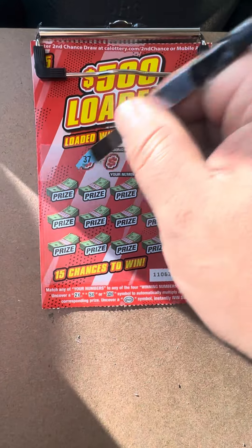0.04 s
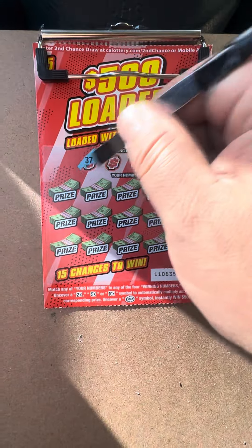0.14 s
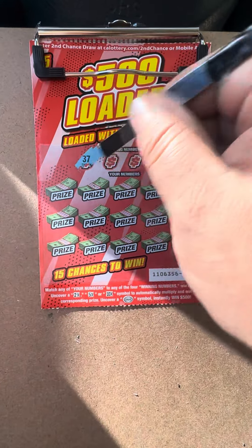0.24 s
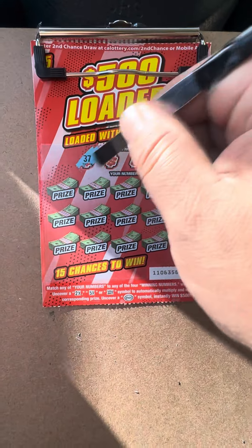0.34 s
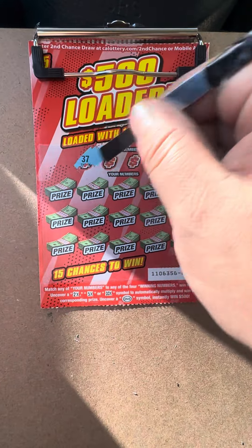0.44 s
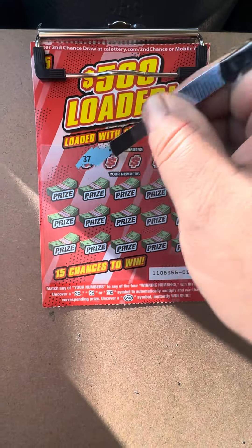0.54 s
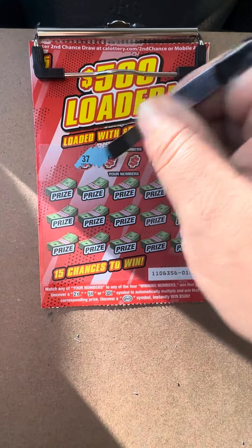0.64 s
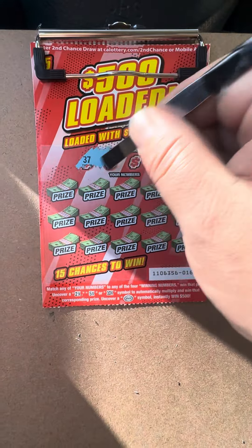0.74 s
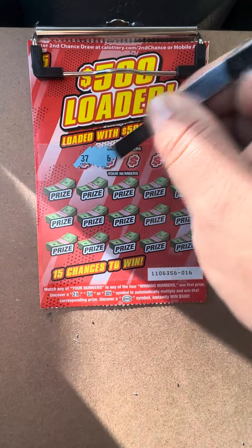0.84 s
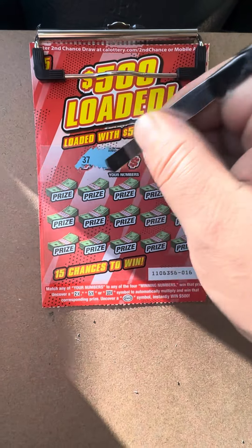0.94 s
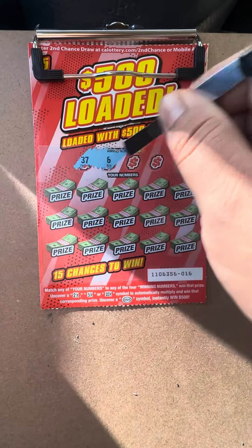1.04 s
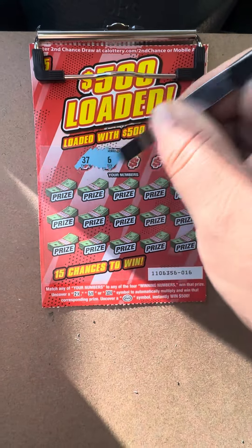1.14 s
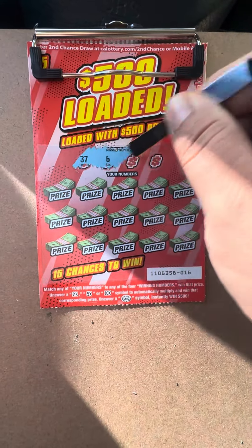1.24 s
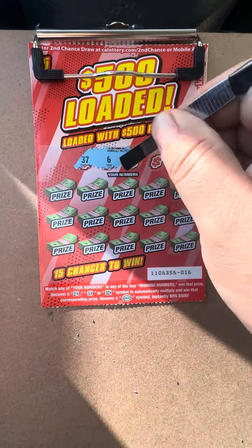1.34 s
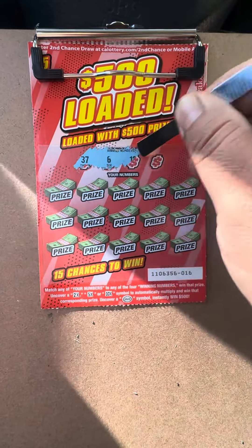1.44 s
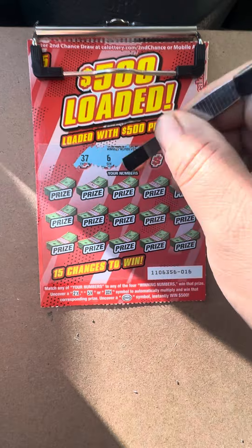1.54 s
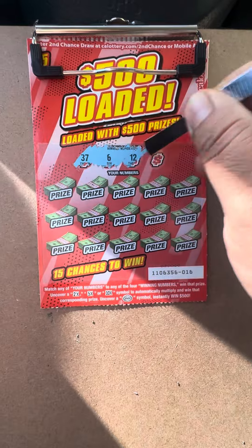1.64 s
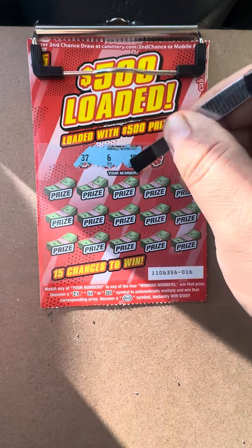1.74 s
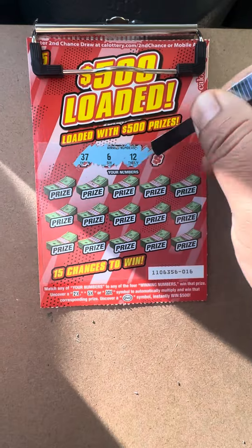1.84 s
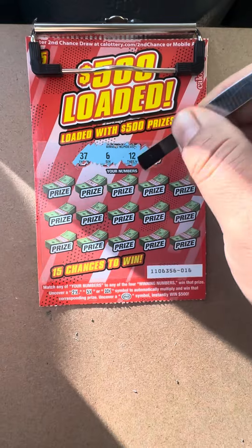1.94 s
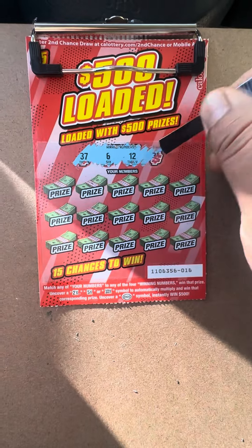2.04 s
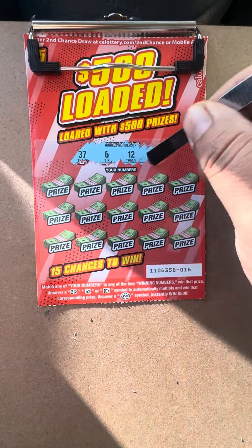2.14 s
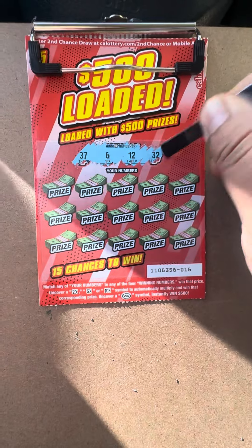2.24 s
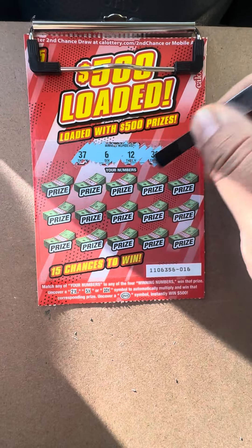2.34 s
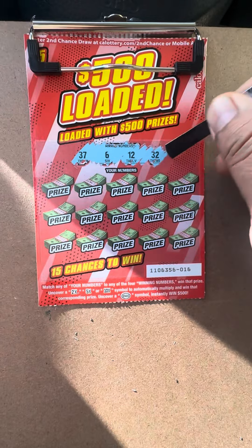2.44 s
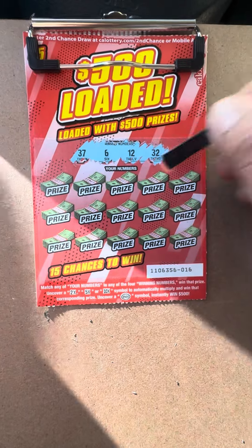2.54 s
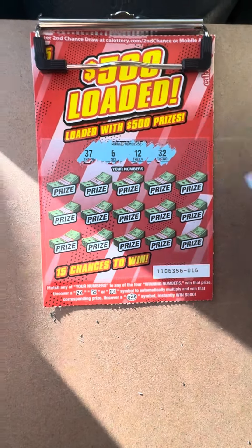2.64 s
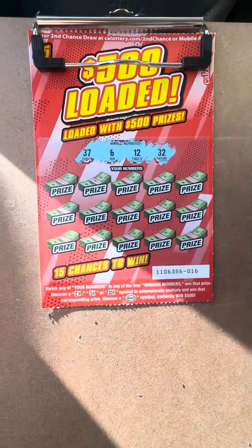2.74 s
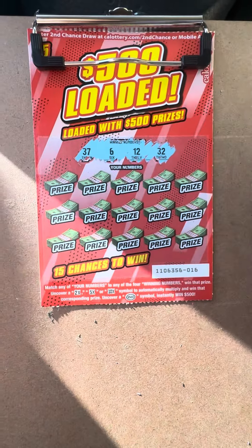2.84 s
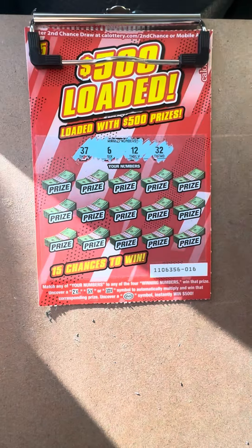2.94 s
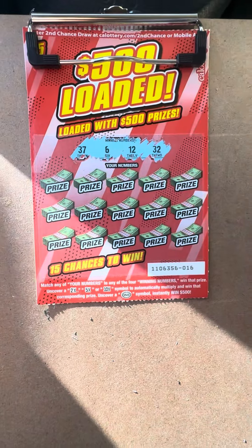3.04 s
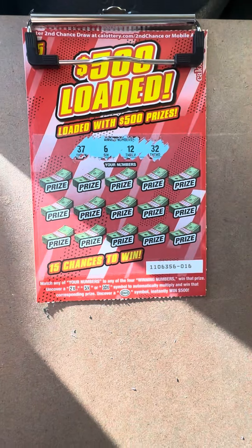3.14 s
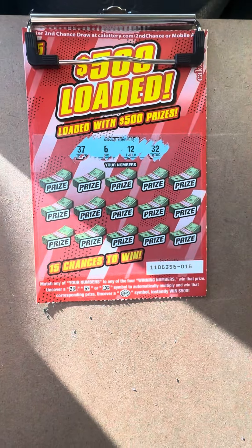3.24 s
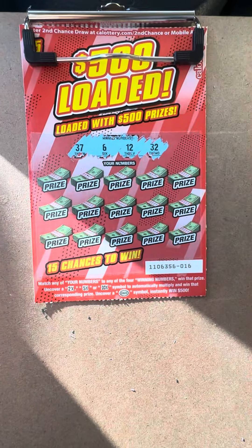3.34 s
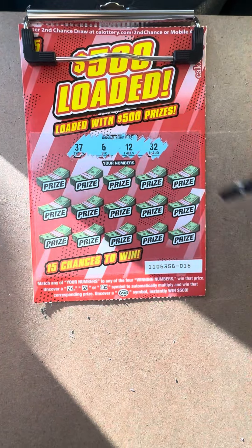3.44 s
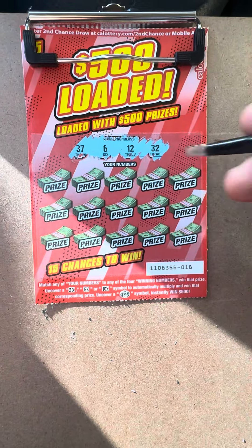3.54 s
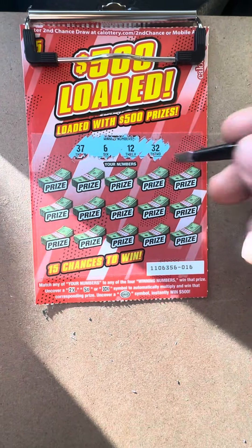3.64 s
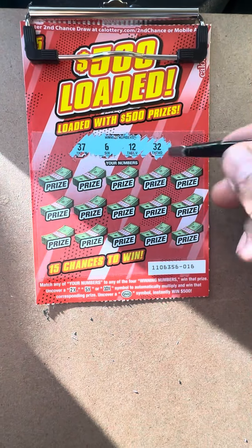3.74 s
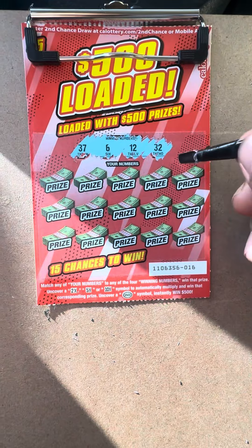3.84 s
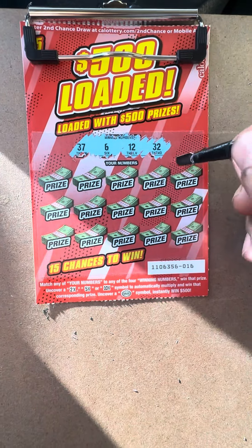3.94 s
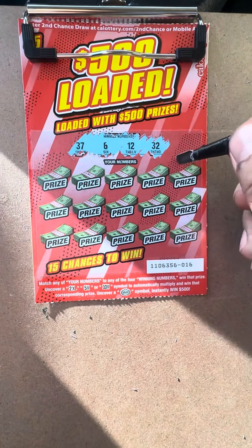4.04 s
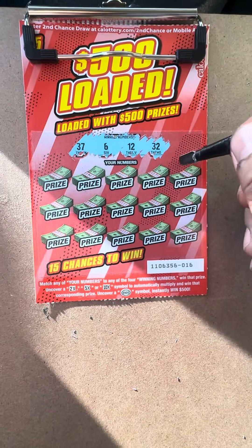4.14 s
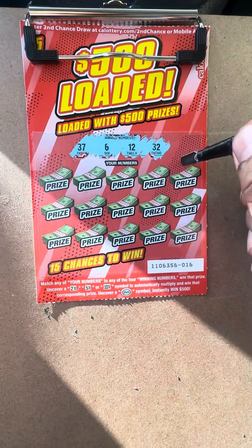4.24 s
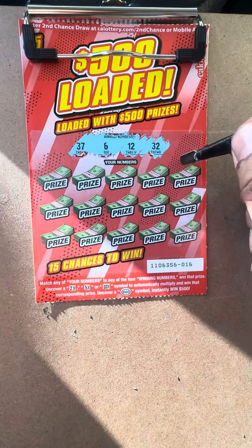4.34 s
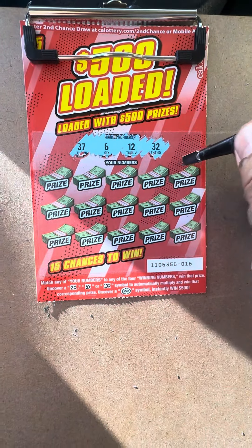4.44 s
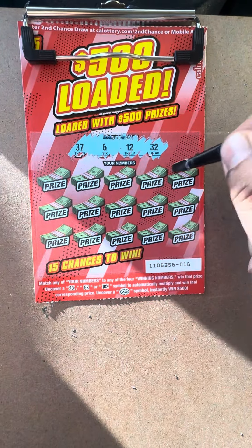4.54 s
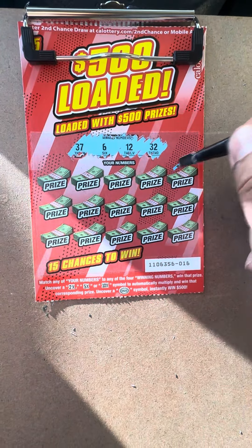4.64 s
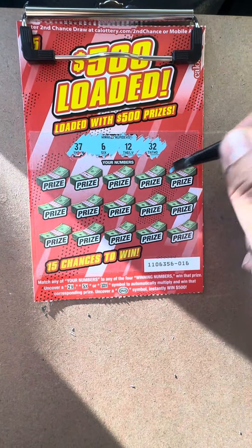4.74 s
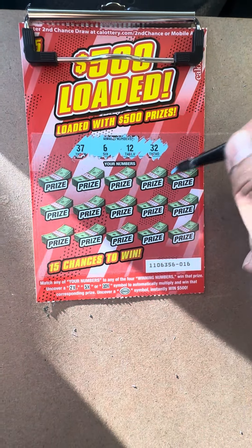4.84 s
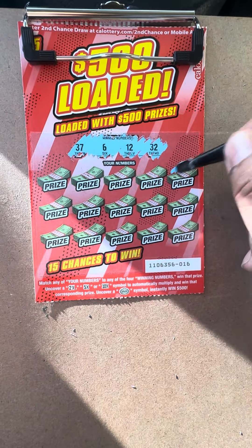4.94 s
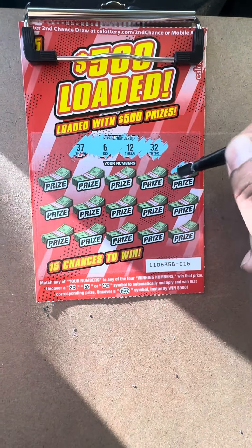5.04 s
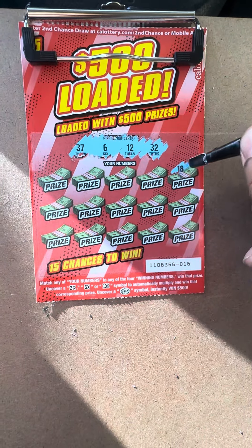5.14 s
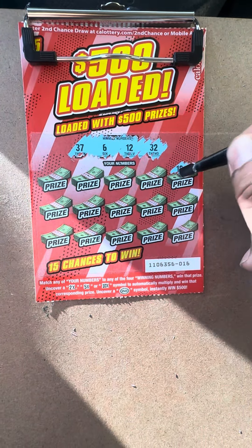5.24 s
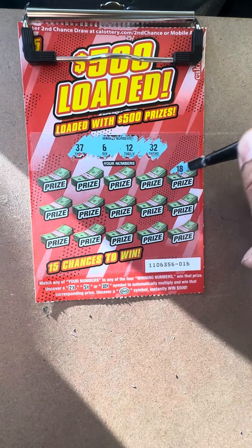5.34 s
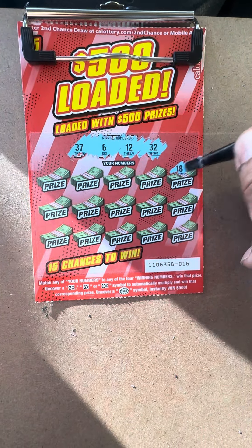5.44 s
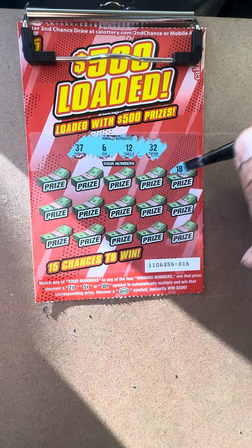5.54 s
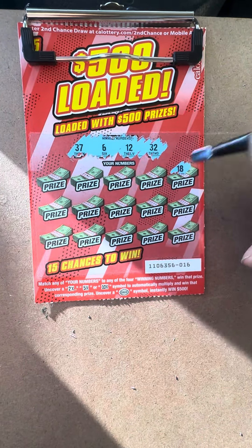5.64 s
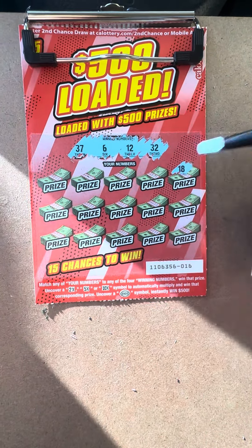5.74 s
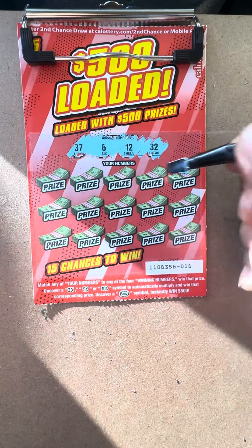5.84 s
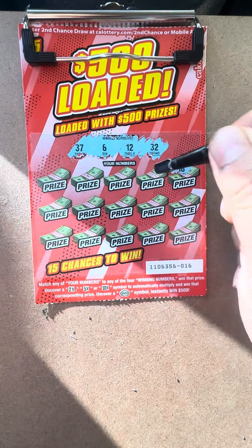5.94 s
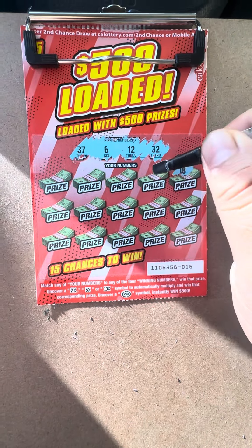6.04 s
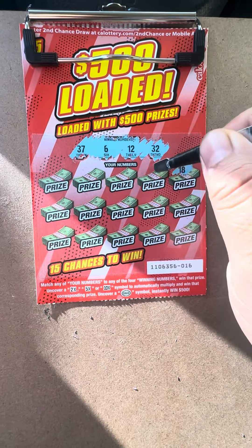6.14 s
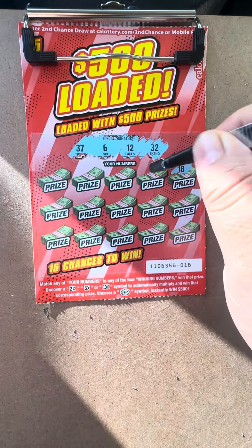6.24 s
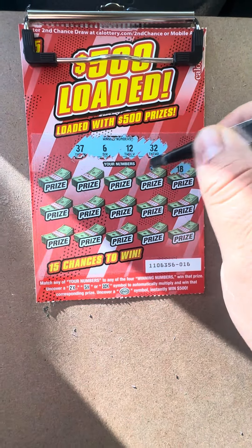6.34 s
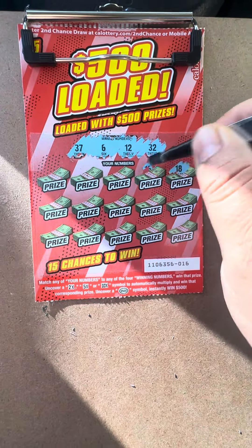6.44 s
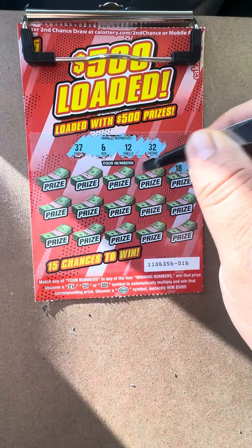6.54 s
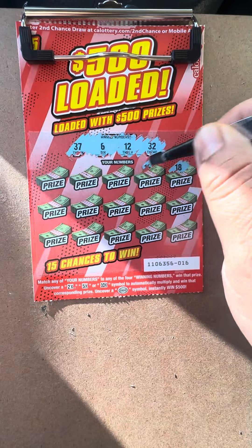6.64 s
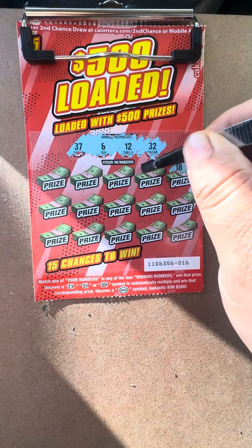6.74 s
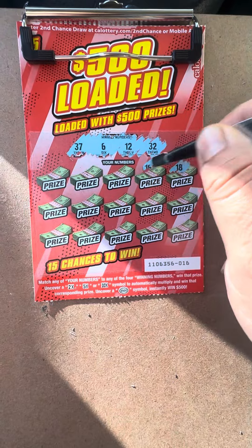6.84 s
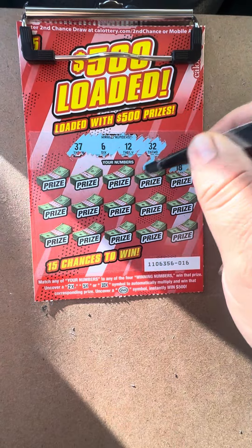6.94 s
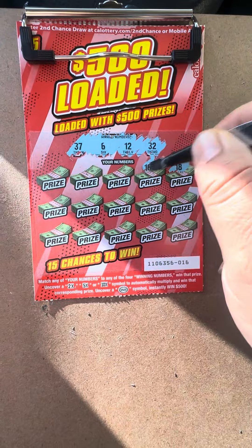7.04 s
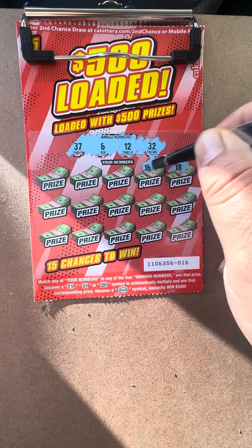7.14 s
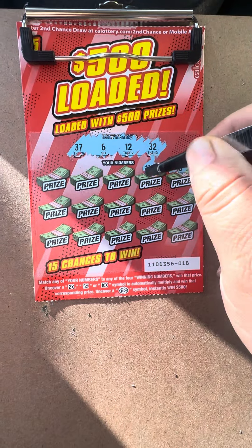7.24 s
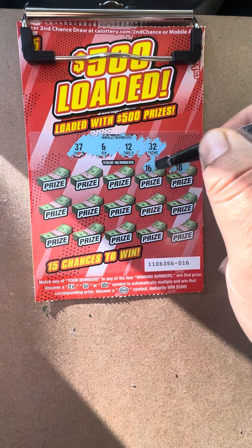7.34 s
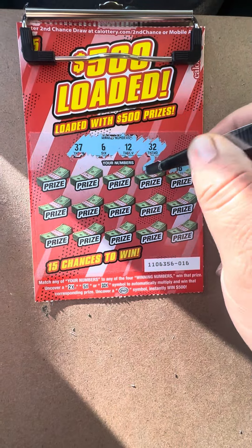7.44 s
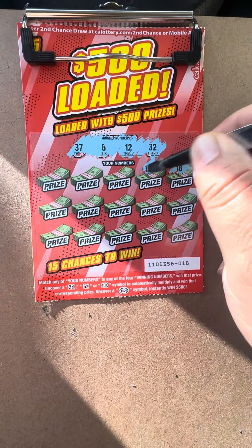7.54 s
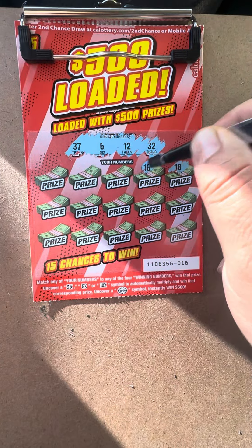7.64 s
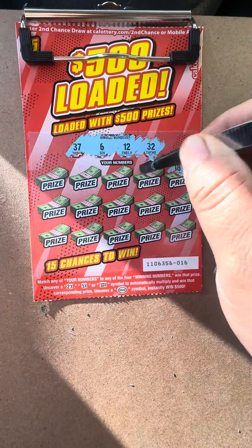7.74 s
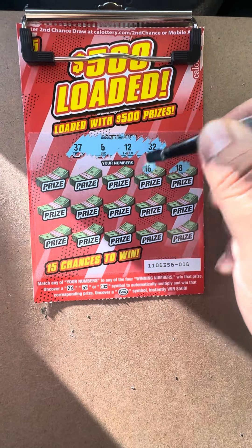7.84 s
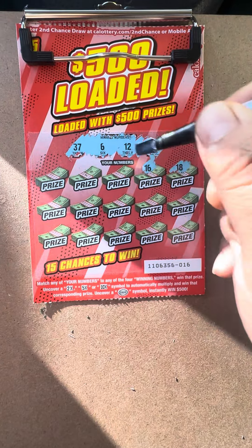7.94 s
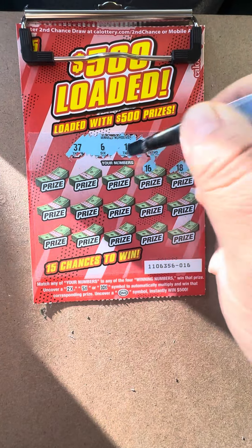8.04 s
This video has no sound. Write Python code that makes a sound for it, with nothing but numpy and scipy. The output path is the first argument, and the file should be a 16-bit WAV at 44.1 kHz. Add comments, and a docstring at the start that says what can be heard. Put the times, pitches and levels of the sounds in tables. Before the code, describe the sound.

A pen tip scratches coating off a paper ticket on a board in three bouts of rapid back-and-forth scrapes, with knocks and clicks between.

```python
"""A pen tip scratches the coating off a paper ticket on a clipboard, in three bouts of quick swipes: a longer
light push, a shorter hard pull. Random flake breaks and stick-slips drive the resonances of ticket and board.
Around the swipes the pen clicks and knocks (decaying rings), the hand slides, and fingers brush the paper
(shaped noise). The space is small and dead (short diffuse tail), over dull sways and a low rumble (noise)."""
import sys
import numpy as np
from scipy import signal
from scipy.fft import rfft, irfft, next_fast_len
from scipy.io import wavfile
from scipy.ndimage import map_coordinates

SR = 44100
rng = np.random.default_rng(int(sys.argv[2]) if len(sys.argv) > 2 else 0)


def unload_wav(signal):
    """Save mono or channel-first audio to the path in sys.argv[1] as 16-bit WAV at rate SR, clipped to [-1, 1]."""
    wavfile.write(
        sys.argv[1],
        SR,
        np.round(np.clip(np.atleast_2d(signal).T, -1, 1) * 32767).astype(np.int16),
    )


N = 356328
TIME_S = np.arange(N) / SR


def from_db(db):
    """Decibels to amplitude gain."""
    return 10 ** (np.asarray(db) / 20)


def rms_one(x):
    """Scale to rms 1."""
    return x / np.sqrt(np.mean(x ** 2) + 1e-20)


def decay(t_s, t60_s):
    """Exponential decay by 60 dB in t60_s."""
    return np.exp(-np.log(1000) * t_s / t60_s)


def add(out, start_s, sound):
    """Mix a sound in from start_s on."""
    at = max(round(start_s * SR), 0)
    out[..., at:at + sound.shape[-1]] += sound[..., :N - at]


def progress(start_s, end_s):
    """Ramp from 0 to 1 over a gesture."""
    return np.linspace(0, 1, max(round((end_s - start_s) * SR), 2))


def arches(rows):
    """Level curve of gestures that rise and fall as half sines."""
    out = np.zeros(N)
    for start_s, end_s, level_db in rows:
        add(out, start_s, from_db(level_db) * np.sin(np.pi * progress(start_s, end_s)))
    return out


def wander(per_s, at_s):
    """Smooth random curve about 0, spread about 1, read at the times at_s."""
    nodes = rng.standard_normal(2000)
    steps = np.arange(0, len(nodes), 1 / 8)
    curve = map_coordinates(nodes, [steps], order=2, mode="mirror")
    return np.interp(at_s * per_s, steps, curve)


def noise(colour, apart_hz):
    """Stereo noise of rms 1: sides alike well below apart_hz, increasingly unrelated above."""
    size = next_fast_len(N, True)
    hz = np.maximum(np.fft.rfftfreq(size, 1 / SR), 1)
    points_hz, points_db = np.transpose(colour)
    gain = from_db(np.interp(np.log(hz), np.log(points_hz), points_db))
    mid, side = rfft(rng.standard_normal((2, size)))
    side = side * hz / (hz + apart_hz)
    return rms_one(irfft(gain * np.array([mid + side, mid - side]))[:, :N])


# background spectrum: pitch_hz, density_db [dB per Hz, relative]
RUMBLE_COLOUR = [(20, -17), (43, 5), (62, 1), (86, 3), (125, -11.5), (175, -8), (260, -20), (450, -28.5),
                 (800, -46), (1400, -41.5), (1900, -36), (2900, -45), (4800, -47.5), (6200, -43.5),
                 (11500, -72)]
# background level: time_s, level_db
RUMBLE_LEVEL = [(0, -46.5), (.3, -50), (.6, -47.5), (2.4, -46), (2.8, -51.5), (4.2, -50.5), (5.9, -53.5),
                (7.0, -47), (8.08, -55.5)]


def background():
    """Rumbling noise, strongest in the bass, with a slowly moving level."""
    level_db = np.interp(TIME_S, *np.transpose(RUMBLE_LEVEL))
    return from_db(level_db) * noise(RUMBLE_COLOUR, apart_hz=900)


# board sways under the hand: start_s, end_s, level_db
BOARD_SWAYS = [(.12, .44, -39), (.85, 1.02, -39.5), (1.0, 1.35, -50.5)]
# sway spectrum: pitch_hz, density_db [dB per Hz, relative]
BOARD_SWAY_COLOUR = [(20, -13.5), (42, 2), (65, 1), (110, -26), (300, -76.5)]


def sways():
    """The board sways dully under the hand: bass noise in smooth arches."""
    return arches(BOARD_SWAYS) * noise(BOARD_SWAY_COLOUR, apart_hz=900)


# fingers brush the paper: start_s, end_s, level_db
FINGER_BRUSHES = [(2.49, 2.57, -64), (2.56, 2.63, -57), (2.81, 2.93, -63), (2.98, 3.13, -76.5),
                  (3.24, 3.33, -66), (3.288, 3.306, -55.5), (5.68, 5.82, -62.5), (5.9, 5.98, -68.5),
                  (7.76, 7.92, -70)]
# brush spectrum: pitch_hz, density_db [dB per Hz, relative]
FINGER_COLOUR = [(300, -24), (700, -19), (1500, -7), (2500, -7.5), (5000, -6), (8000, -2), (11000, -23),
                 (15500, -11.5)]


def fingers(skin_db=2.0, skin_per_s=90):
    """Skin catches unevenly on the paper: arched noise with a wandering level."""
    catches = from_db(skin_db * wander(skin_per_s, TIME_S))
    return arches(FINGER_BRUSHES) * catches * noise(FINGER_COLOUR, apart_hz=2500)


# small plastic clicks of the pen: time_s, peak_db
PEN_CLICKS = [(2.506, -52), (3.543, -55.5), (3.609, -18), (3.983, -31), (5.641, -47.5), (5.7, -37),
              (6.105, -31.5), (6.948, -49)]
# pen barrel modes: pitch_hz, level_db [relative], t60_s
BARREL_MODES = [(2390, -15.5, 0.0073), (3740, -15.5, 0.007), (4560, -16.5, 0.016), (5770, -2, 0.0044),
                (6750, 1, 0.0039), (7530, -2.5, 0.0033), (8820, -5, 0.0054)]


def pen_clicks(rise_s=0.00049):
    """Each click sets the plastic barrel ringing very briefly, in random phase on each side."""
    out, t_s = np.zeros((2, N)), np.arange(SR // 20) / SR
    for time_s, peak_db in PEN_CLICKS:
        ring = np.zeros((2, len(t_s)))
        for pitch_hz, level_db, t60_s in BARREL_MODES:
            wave = np.sin(2 * np.pi * pitch_hz * t_s + rng.normal(0, 1, (2, 1)))
            ring += from_db(level_db) * decay(t_s, t60_s) * wave
        ring *= 1 - np.exp(-t_s / rise_s)
        add(out, time_s, from_db(peak_db) * ring / np.abs(ring).max())
    return out


# the hand moves on to another patch of the ticket: time_s
PATCH_MOVES = [3.0, 5.9]
# pen lands or knocks on the board: time_s, strength_db, contact_hz [cut-off]
BOARD_KNOCKS = [(0.476, -31, 900), (1.671, -29, 700), (1.686, -29, 600), (2.007, -26.5, 600),
                (3.611, -12, 1197), (3.995, -40, 490), (4.324, -36.5, 1110), (4.395, -33.5, 800),
                (4.726, -32.5, 2200), (5.474, -34, 700), (5.547, -42.5, 2001), (6.108, -37.5, 600),
                (6.157, -35.5, 900), (6.197, -22, 614), (6.708, -23.5, 450)]
# tap as the tip sets off on each push: strength_db on patch 1, 2, 3
PUSH_TAP_DB = [-48.5, -42.5, -51.5]
TAP_CONTACT_HZ = 1405


def blows():
    """Every contact with the board: the knocks, and a light tap at the start of each swipe."""
    starts_s = [row[0] for row in TIP_SWIPES]
    taps = [(s, PUSH_TAP_DB[np.searchsorted(PATCH_MOVES, s)], TAP_CONTACT_HZ) for s in starts_s]
    return list(BOARD_KNOCKS) + taps


# ticket and board resonances: pitch_hz, width_hz [nominal], patch_1_db, patch_2_db, patch_3_db
BOARD_MODES = [(160, 108, -45, -44, -45.5), (250, 136, -48.5, -45.5, -49.5),
               (373.8, 71.4, -46.5, -43, -45.5), (467.6, 126, -46.5, -43.5, -45), (531, 240, -53, -47, -61),
               (628, 72.6, -48, -51, -47), (712, 108, -52, -47.5, -50.5), (879, 67, -52.5, -51.5, -57.5),
               (1033, 186, -43, -44.5, -47), (1131, 81, -49.5, -55.5, -51), (1322, 230, -51.5, -49, -51.5),
               (1428, 250, -53.5, -48, -56), (1636, 175, -51, -47, -49.5), (1964, 290, -61.5, -58, -56.5),
               (2276, 200, -42, -48, -46), (2475, 404, -44, -45.5, -53), (2892, 340, -53, -60, -57),
               (3150, 350, -59.5, -56.5, -60), (3680, 940, -51.5, -56, -59.5),
               (4146, 480, -53, -58.5, -54.5), (4870, 910, -52.5, -57.5, -59), (5737, 580, -51, -58, -59.5),
               (6350, 460, -56.5, -64.5, -74), (7250, 1200, -54, -61, -66), (7600, 2200, -53, -57.5, -57),
               (9230, 520, -52.5, -60, -61.5)]
# each resonance at the two microphones: left_right_db, left_lead_rad
MODE_PORTS = [(1, 0.0), (1, 0.0), (0, -0.2), (-1, -0.5), (-7, -0.6), (-11, -0.8), (-8, 1.8), (-9, 4.0),
              (-2, 1.0), (-1, 1.8), (12, 0.9), (1, 0.2), (-2, 0.2), (17, -0.4), (-2, -1.4), (-2, -0.0),
              (3, 0.5), (-10, 2.6), (2, -0.0), (0, 0.0), (-1, 0.7), (-1, -0.8), (-3, -0.5), (1, -0.8),
              (-1, -1.8), (1, -2.6)]


def ports(left_right_db, left_lead_rad):
    """Complex gains with which a resonance reaches the left and right microphone."""
    sides = np.array([[.5], [-.5]])
    return from_db(left_right_db * sides) * np.exp(1j * left_lead_rad * sides)


def knocks(damping=0.42, scatter_rad=0.97, crest_db=17, rise_cycles=0.49):
    """A blow rings all the board's resonances; a softer contact leaves out the high ones."""
    out, t_s = np.zeros((2, N)), np.arange(SR // 10) / SR
    pitch_hz, width_hz, *patch_db = np.transpose(BOARD_MODES)
    rings = np.exp(np.outer(2j * np.pi * pitch_hz - np.pi * width_hz * damping, t_s))
    mode_ports = ports(*np.transpose(MODE_PORTS))
    for time_s, strength_db, contact_hz in blows():
        phase_rad = rng.normal(0, scatter_rad, len(BOARD_MODES))
        strength = from_db(patch_db[np.searchsorted(PATCH_MOVES, time_s)]) * np.exp(1j * phase_rad)
        ring = ((mode_ports * strength) @ rings).imag
        ring = signal.sosfilt(signal.butter(2, contact_hz, fs=SR, output="sos"), ring)
        ring *= 1 - np.exp(-t_s * contact_hz / rise_cycles)   # soft contact builds up slowly
        add(out, time_s, from_db(strength_db - crest_db) * rms_one(ring))
    return out


# crumbling coating spectrum: pitch_hz, density_db [dB per Hz, relative]
CRUMB_COLOUR = [(4000, -29.5), (9000, 7.5), (12000, -28.5), (14000, 14.5), (15500, 15.5)]


def dust(middle_drive, dust_db=-67, crumbs_db=6.5, crumbs_per_s=110):
    """Fine hiss of the crumbling coating: uneven noise following the friction."""
    crumbs = from_db(crumbs_db * wander(crumbs_per_s, TIME_S))
    hiss = noise(CRUMB_COLOUR, apart_hz=12000) * np.array([[1], [-1]])   # sides in opposite phase
    return from_db(dust_db) * middle_drive * crumbs * hiss


# push, then pull: attack_s, release_s, bass_db, bass_per_bite [dB/dB],
# treble_db, treble_per_bite [dB/dB], treble_swell_db
STROKE_KINDS = [(.009, 0.017, 0.97, 0.42, 1, 1.7, 14.5), (.0115, 0.013, 5, 0.23, -4.5, 1.36, 10)]
# stroke tone, read at each start: time_s, bass_db, treble_db
STROKE_TONE = [(0, -0.5, -3), (.9, 1, 0), (1.7, 0, 2.5), (2.301, -0.5, -2), (4.5, 0.5, 1.1), (5.3, -2, 0.5),
               (6.4, 2.5, 2.5), (7.7, 0, 0.5)]
# exponent of the tip speed: bass, middle, treble
SPEED_EXPONENTS = [1.3, 2.5, 4.6]
SWELL_DB = 5.5   # growth over a stroke, before lean
LATE_BITE = 1.3   # dB of treble swell per dB of bite lost: a lighter bite catches later


def stroke(start_s, length_s, bite_db, lean_db, kind):
    """Bass, middle, treble drive: the tip speeds up, runs, stops; deeper bite is louder and brighter."""
    attack_s, release_s, bass_db, bass_per_bite, treble_db, treble_per_bite, treble_swell_db = kind
    u = progress(start_s, start_s + length_s)
    speed = np.tanh(u * length_s / attack_s) * np.tanh((1 - u) * length_s / release_s)
    tone_s, tone_bass_db, tone_treble_db = np.transpose(STROKE_TONE)
    bass_db = bass_db + bass_per_bite * bite_db + np.interp(start_s, tone_s, tone_bass_db)
    treble_db = treble_db + treble_per_bite * bite_db + np.interp(start_s, tone_s, tone_treble_db)
    swell_db = SWELL_DB + lean_db + np.array([0, 0, treble_swell_db - LATE_BITE * bite_db])
    level_db = np.array([[bass_db], [bite_db], [treble_db]]) + np.outer(swell_db, u - .5)
    return from_db(level_db) * speed ** np.array(SPEED_EXPONENTS)[:, None]


# one to-and-fro of the tip: start_s, push_s, pull_s, push_bite_db, pull_bite_db,
# lean_db [extra force at the far end]
TIP_SWIPES = [(0.009, 0.095, 0.067, 0.5, 5.5, 8), (0.196, 0.096, 0.074, 2, 5.5, 9.0),
              (0.405, 0.099, 0.071, 1.5, 7, 0.5), (0.603, 0.088, 0.071, 2, 6.5, 4),
              (0.795, 0.092, 0.065, 4, 10, 8), (0.981, 0.094, 0.07, 1.5, 7.5, 14.5),
              (1.18, 0.094, 0.068, 4, 7, 3.5), (1.376, 0.091, 0.072, 2.5, 6.5, 8.5),
              (1.565, 0.097, 0.075, 2.5, 5.5, 10.5), (1.762, 0.093, 0.08, 3, 7, 5.5),
              (1.949, 0.095, 0.082, 2.0, 5.5, 11.5), (2.132, 0.1, 0.08, -2, 7, 18.5),
              (2.322, 0.093, 0.068, 1, 4, 3.5), (4.392, 0.057, 0.068, -6.5, 8.5, 12.5),
              (4.55, 0.073, 0.076, -2.5, 6, -9), (4.722, 0.081, 0.072, 0, 9.0, 9),
              (4.894, 0.087, 0.072, 3.5, 9, 8.5), (5.07, 0.085, 0.069, 2.5, 7.5, 6.5),
              (5.251, 0.079, 0.063, 1.5, 5, 11), (5.405, 0.077, 0.1, -14, -10.5, 17.5),
              (6.15, 0.016, 0.054, -22.0, 3, 8), (6.242, 0.076, 0.066, -1, 11, 0),
              (6.413, 0.076, 0.064, 4.5, 6, -6.5), (6.587, 0.091, 0.064, -13.5, 5, -1),
              (6.764, 0.077, 0.07, 3, 11, 2), (6.936, 0.079, 0.059, 1.5, 8.5, 6.5),
              (7.093, 0.081, 0.069, -13, 6.5, 10), (7.258, 0.084, 0.07, -2.5, -8.5, 20),
              (7.432, 0.078, 0.083, -19, -3.5, 3.5), (7.608, 0.051, 0.095, -1, -7.0, -13.5)]
# hand slides lightly over the board: start_s, end_s, level_db
HAND_SLIDES = [(2.488, 2.62, -32), (3.681, 3.8, -33), (4.1, 4.197, -35.5), (7.753, 7.84, -29.5)]
# slide colour: bass_db, middle_db, treble_db
HAND_SLIDE_DB = [14, -2, 1]
TURN_S = 0.012   # rest at the far end


def friction(rattle_db=(22, 14, 4), rattle_t60_s=0.12, catch_db=(10, 22, 21), catch_t60_s=0.034, hard_hz=1500):
    """Bass, middle, treble drive: the tip pushes out, rests to turn, pulls back; blows add bursts."""
    drive = np.outer(from_db(HAND_SLIDE_DB), arches(HAND_SLIDES))
    push, pull = STROKE_KINDS
    for start_s, push_s, pull_s, push_bite_db, pull_bite_db, lean_db in TIP_SWIPES:
        back_s = start_s + push_s + TURN_S
        add(drive, start_s, stroke(start_s, push_s, push_bite_db, lean_db, push))
        add(drive, back_s, stroke(back_s, pull_s, pull_bite_db, -lean_db, pull))
    t_s = np.arange(SR // 4) / SR
    rattle, snap = decay(t_s, rattle_t60_s), decay(t_s, catch_t60_s)
    for time_s, strength_db, contact_hz in blows():
        # the loose ticket buzzes against the board
        add(drive, time_s, np.outer(from_db(strength_db + np.array(rattle_db)), rattle))
        # a hard landing also chips the coating
        hardness = (contact_hz / hard_hz) ** 2
        add(drive, time_s, np.outer(from_db(strength_db + np.array(catch_db)), snap) * hardness)
    return drive


def grains(per_s, spread_db):
    """Random breaks of uneven size; rms 1."""
    born = rng.random(N) < per_s / SR
    return rms_one(born * from_db(spread_db * np.clip(rng.standard_normal(N), -2, 2)))


def resonate(x, pitch_hz, width_hz):
    """Steep double-pole resonance, complex output; white noise keeps its rms in the real part."""
    pole = np.exp((2j * np.pi * pitch_hz - np.pi * width_hz) / SR)
    gain = (1 - abs(pole)) ** 2 * np.sqrt(8 * SR / (np.pi * width_hz))
    return signal.lfilter([gain], [1, -2 * pole, pole ** 2], x + 1e-18)


# drive of a resonance by pitch: pitch_hz, bass_share, middle_share, treble_share
DRIVE_SHARES = [(170, .45, .45, 0), (370, 1, 0, 0), (640, 1, 0, 0), (1200, 0, 1, 0), (2500, 0, 1, 0),
                (4500, 0, 0, 1)]


def scratch(drive, slip_shares=(.5, .3, .2), place_db=2.5, places_per_s=24, bend=0.01188,
            uneven_db=2.0, bumps_per_s=60):
    """Dense flakes and sparser stick-slips strike each resonance with a strength of its own."""
    flakes, slips = grains(per_s=7000, spread_db=4.0), grains(per_s=320, spread_db=3.0)
    at = np.flatnonzero((flakes + slips) * drive[1])
    at_s = at / SR
    patch = np.searchsorted(PATCH_MOVES, at_s)
    # the coating gives way unevenly
    coating = rms_one(from_db(uneven_db * wander(bumps_per_s, at_s)))
    # the paper bends under the moving tip and detunes the resonances
    detune = bend * wander(places_per_s, TIME_S)
    flex_phase = 2 * np.pi * np.cumsum(detune).astype(np.float32) / SR
    share_hz, *shares = np.transpose(DRIVE_SHARES)
    out = np.zeros((2, N))
    for (pitch_hz, width_hz, *patch_db), port in zip(BOARD_MODES, MODE_PORTS):
        blend = np.array([np.interp(np.log(pitch_hz), np.log(share_hz), share) for share in shares])
        slip_share = np.clip(blend @ np.array(slip_shares), 0, 1)
        sizes = coating * (np.sqrt(1 - slip_share) * flakes[at] + np.sqrt(slip_share) * slips[at])
        # the tip crosses nodes and bellies of the resonance
        place = rms_one(from_db(place_db * wander(places_per_s, at_s)))
        sign = np.sign(rng.random(len(at)) - .5)
        force = np.zeros(N)
        force[at] = sizes * place * sign * (blend @ drive[:, at]) * from_db(patch_db)[patch]
        flex = np.cos(pitch_hz * flex_phase) + 1j * np.sin(pitch_hz * flex_phase)
        ring = resonate(force, pitch_hz, width_hz) * flex
        out += (ports(*port) * ring).real
    return out


def edge_echo(x, share=0.61, trip_s=.0016, travel=0.068, moves_per_s=12, above_hz=3000):
    """Short waves in the paper return from its edge; their trip changes with the place of the tip."""
    n = np.arange(N)
    lag = trip_s * SR * (1 + travel * wander(moves_per_s, TIME_S))
    short = signal.sosfilt(signal.butter(2, above_hz, "high", fs=SR, output="sos"), x)
    return x + share * np.array([np.interp(n - lag, n, side) for side in short])


def room(x, t60_s=0.13, wet_db=-22, first_echo_s=0.0028, band_hz=(250, 7000)):
    """Close, padded walls return a short diffuse tail, different on each side."""
    t_s = np.arange(SR // 2) / SR
    tail = rng.standard_normal((2, len(t_s))) * decay(t_s, t60_s) * (t_s > first_echo_s)
    tail = signal.sosfilt(signal.butter(1, band_hz, "band", fs=SR, output="sos"), tail)
    tail = tail / np.sqrt(np.sum(tail ** 2) / 2)
    return from_db(wet_db) * signal.fftconvolve(x, tail, axes=1)[:, :N]


def scene(scratch_db=-1.74, paper_top_hz=10000):
    """Pen, board and fingers close to the microphones, over the sways and the background."""
    drive = friction()
    board = from_db(scratch_db) * edge_echo(scratch(drive)) + knocks()
    # paper and plastic damp the highest ringing
    damping = signal.butter(8, paper_top_hz, fs=SR, output="sos")
    solids = signal.sosfilt(damping, board + pen_clicks())
    near = solids + dust(drive[1]) + fingers()
    return near + room(near) + sways() + background()


def record(dry, dip_hz=11900, dip_q=8.6, dip_share=0.5, cutoff_hz=15900):
    """A shallow dip in the high treble; the top is cut steeply."""
    notched = signal.lfilter(*signal.iirnotch(dip_hz, dip_q, fs=SR), dry)
    coloured = dry + dip_share * (notched - dry)
    return signal.sosfilt(signal.ellip(10, .1, 80, cutoff_hz, fs=SR, output="sos"), coloured)


dry = scene()
out = record(dry)
unload_wav(out)
```